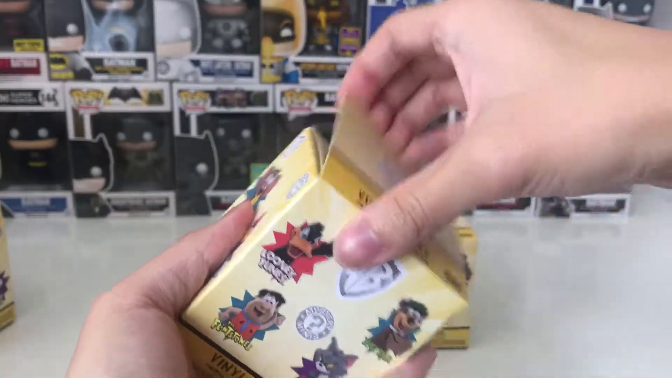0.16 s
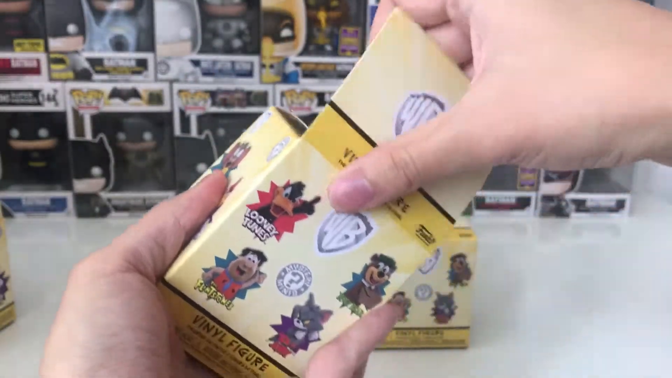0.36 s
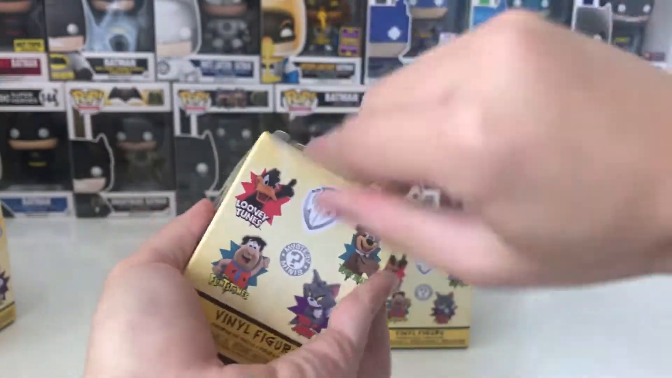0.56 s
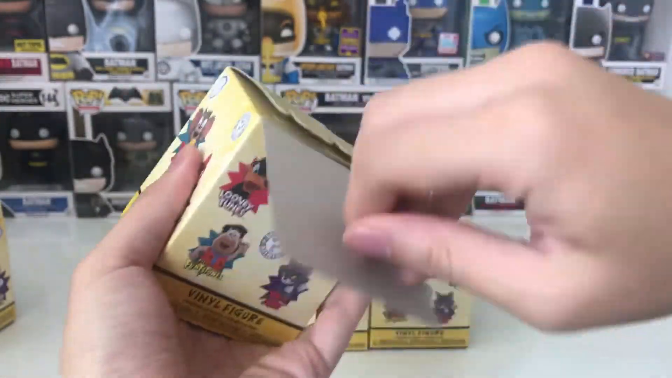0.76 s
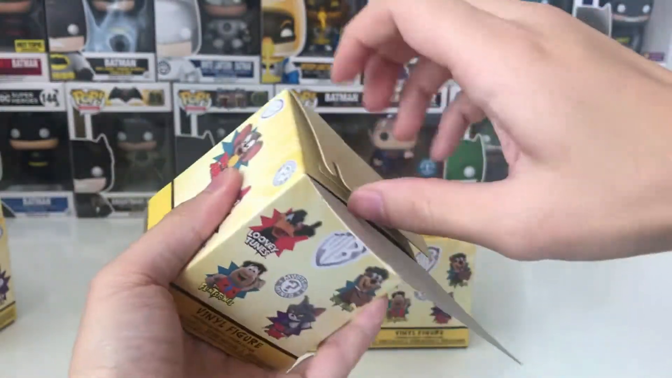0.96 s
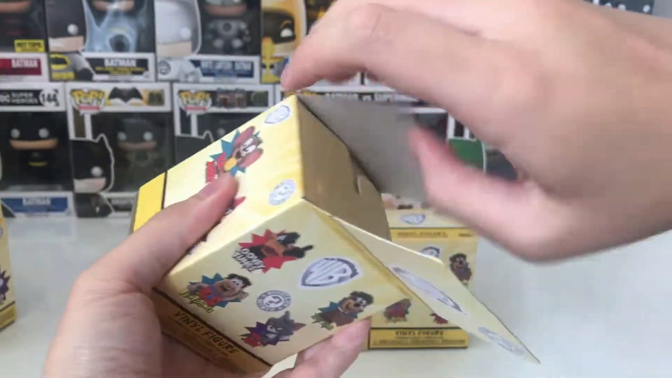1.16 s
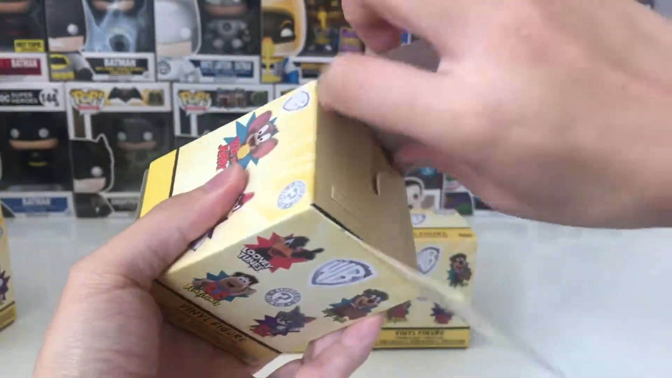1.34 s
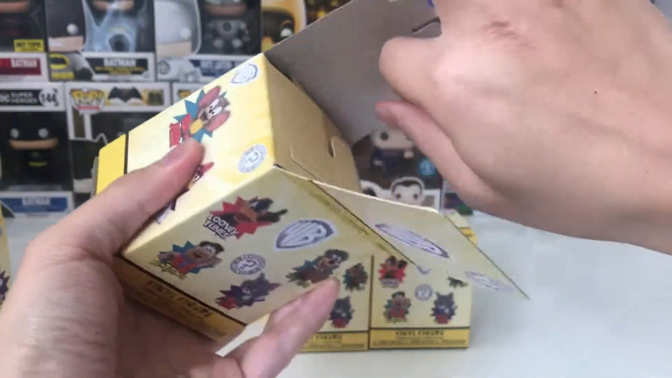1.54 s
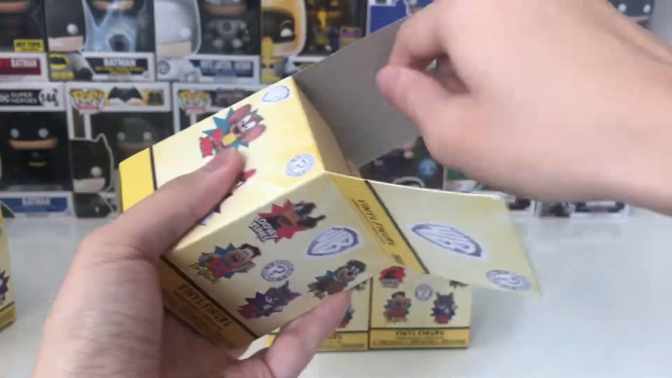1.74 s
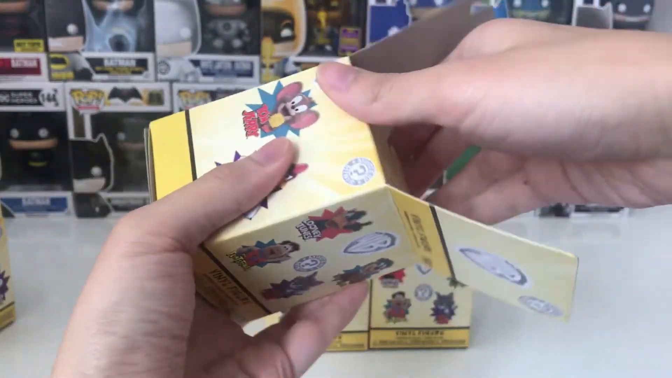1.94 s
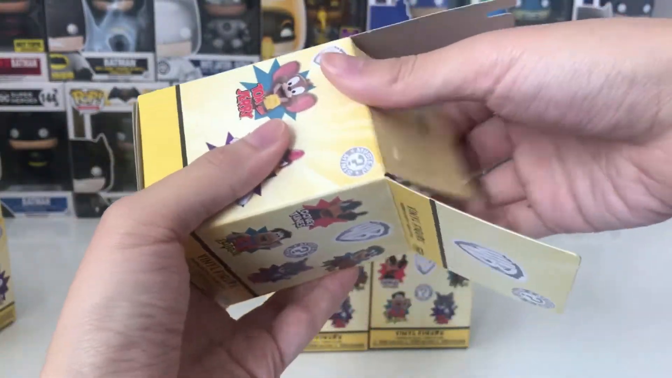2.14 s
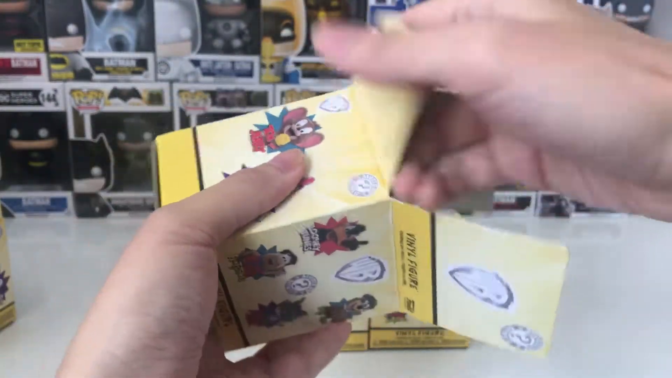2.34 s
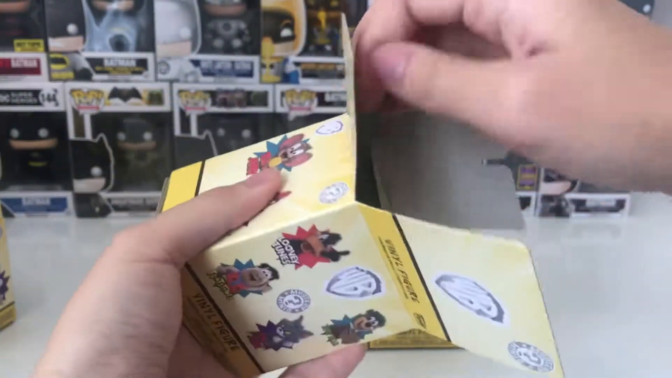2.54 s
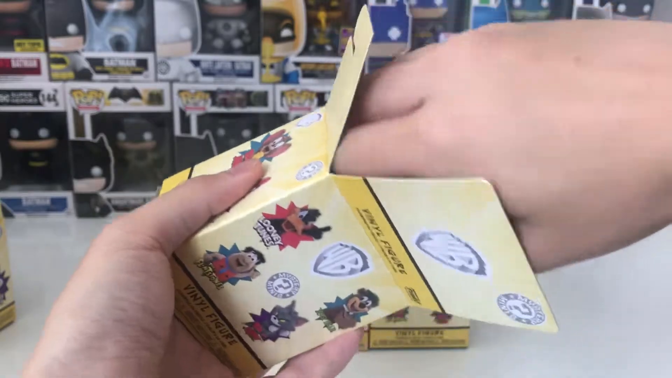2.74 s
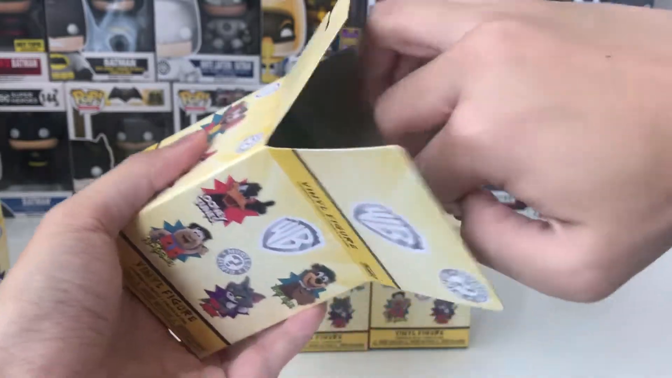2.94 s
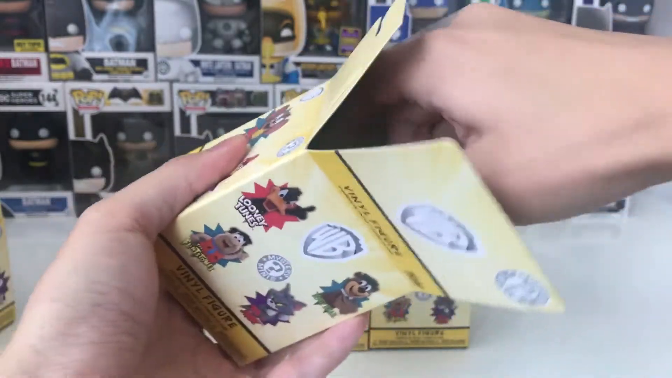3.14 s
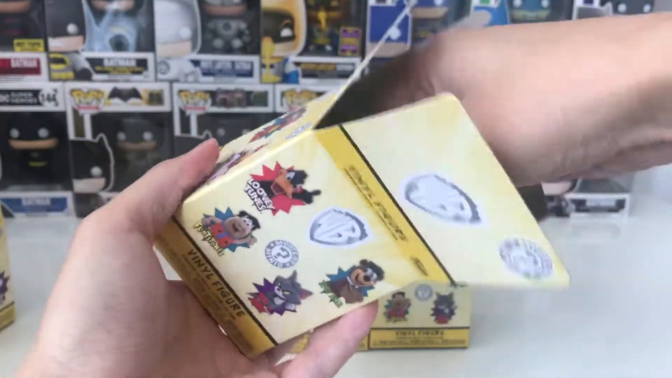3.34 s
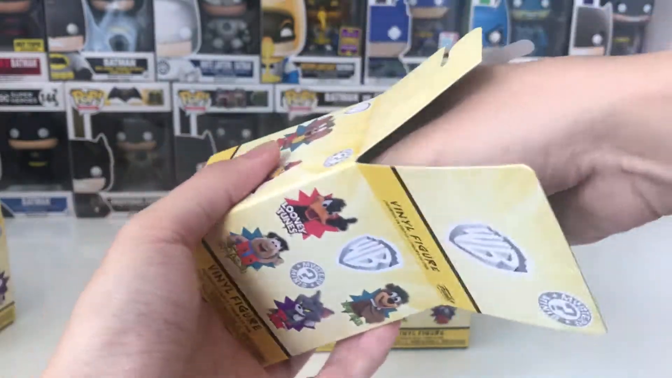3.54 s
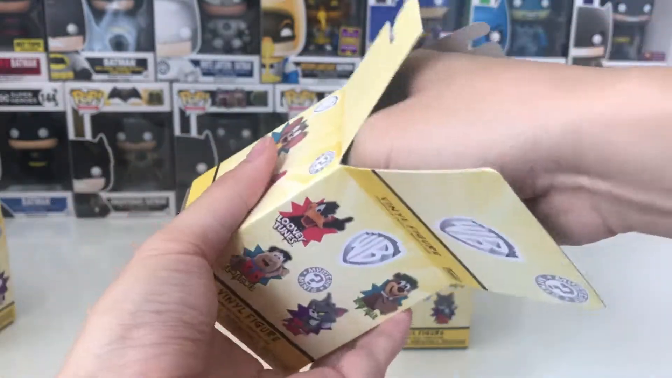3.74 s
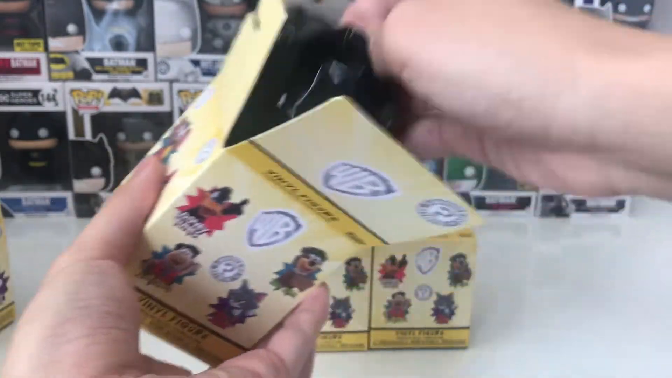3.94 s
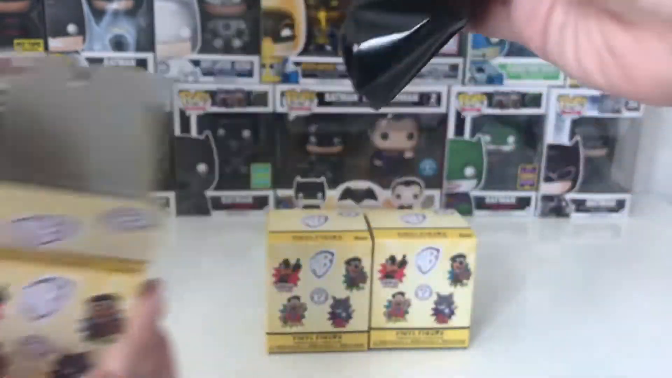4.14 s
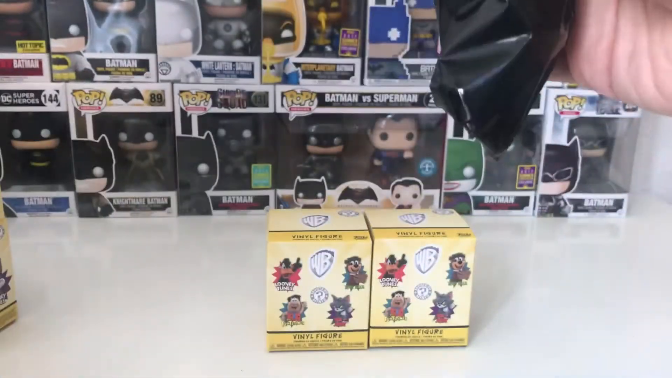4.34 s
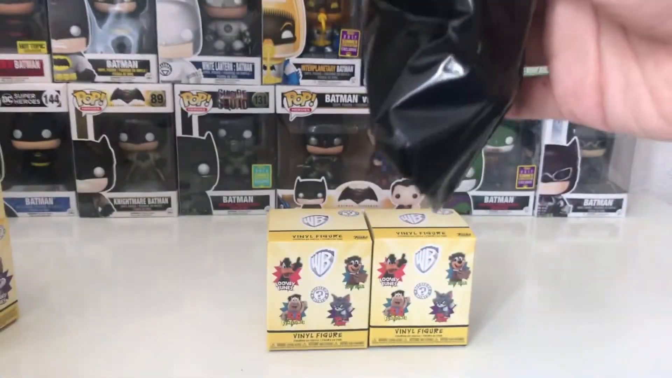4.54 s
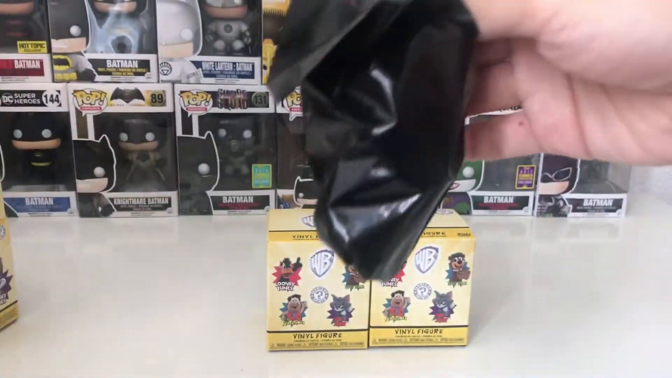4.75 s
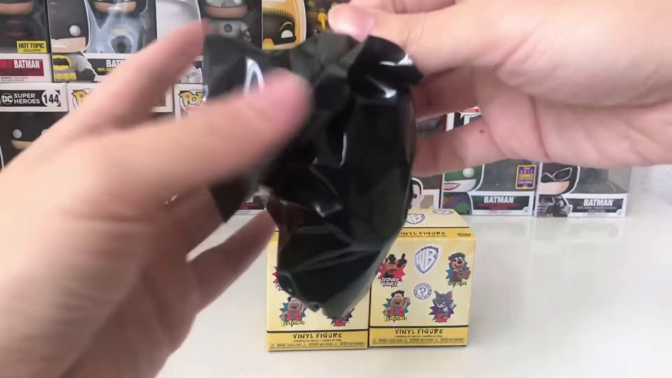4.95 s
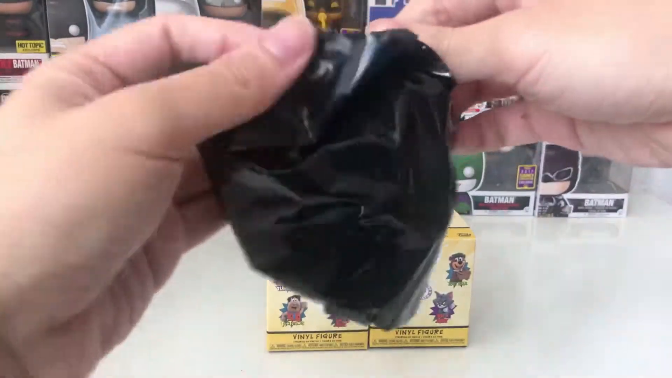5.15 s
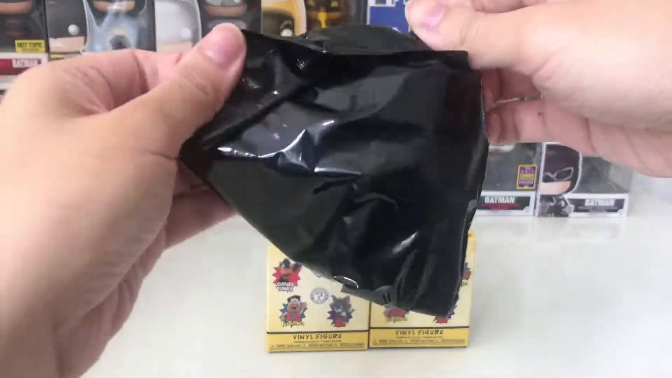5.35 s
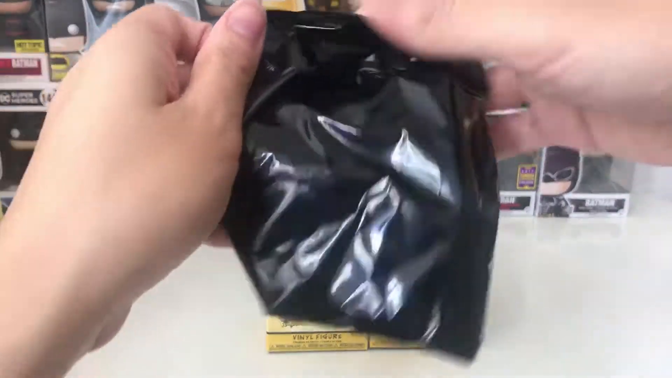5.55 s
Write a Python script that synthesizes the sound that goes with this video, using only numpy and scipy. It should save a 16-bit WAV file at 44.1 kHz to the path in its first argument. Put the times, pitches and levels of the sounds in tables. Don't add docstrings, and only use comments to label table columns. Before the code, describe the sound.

Close microphone, small quiet room with short reverberation and faint hiss. Card tears with a bright crack, flaps scrape and tabs tick with a boxy ring. After a second loud flap snap, a foil bag rustles inside the box, is drawn out with crisp pops, briefly goes nearly quiet with soft desk bumps, then crinkles brightly in the open.

```python
import sys
import numpy as np
from scipy import signal
from scipy.fft import rfft, irfft, next_fast_len
from scipy.io import wavfile
from scipy.ndimage import uniform_filter1d

SR = 44100
rng = np.random.default_rng(int(sys.argv[2]) if len(sys.argv) > 2 else 0)


def wav_out(sig):
    wavfile.write(sys.argv[1], SR, np.round(np.clip(np.atleast_2d(sig).T, -1, 1) * 32767).astype(np.int16))


def rack_gain(trim_db):
    fader = np.asarray(trim_db, float)
    return 10 ** (fader / 20)


N = 251357
LEAD_S = 0.001
FOIL_FROM_S = 3.17
FOIL_T60_S, FOIL_DB = 0.011, 1.5

# centre_hz, width_hz, level_db
BOX_MODES = [(305, 60, -3), (547, 89, 0), (677, 178, 4.5), (968, 300, 6.5), (1210, 255, 4), (1600, 170, 1)]
# centre_hz, width_hz, level_db
FACE_MODES = [(1560, 1260, -1.5), (3150, 90, 4), (3830, 2230, -5.5), (7400, 1100, 0)]


def evened(x):
    return x / np.sqrt(np.mean(x ** 2) + 1e-20)


def peaked(x):
    return x / abs(x).max()


def add(mix, start_s, sound):
    part = mix[round(start_s * SR):][:len(sound)]
    part += sound[:len(part)]


def coloured(x, points):
    point_hz, point_db = np.transpose(points)
    size = next_fast_len(len(x))
    hz = np.fft.rfftfreq(size, 1 / SR)
    level_db = np.interp(np.log(hz + 1), np.log(point_hz + 1), point_db)
    return irfft(rfft(x, size) * rack_gain(level_db), size)[:len(x)]


def resonate(x, hz, width_hz):
    return signal.lfilter(*signal.iirpeak(hz, hz / width_hz, SR), x)


def body(x, modes):
    total = 0
    for k, (hz, width_hz, db) in enumerate(modes):
        total = total + (-1) ** k * rack_gain(db) * resonate(x, hz, width_hz)
    return total


def background():
    # freq_hz, level_db (per Hz)
    air_spectrum = [(41, -59), (70, -2), (129, -8.5), (199, -6), (368, -15.5), (2480, -24.5), (4580, -24),
                    (16000, -36)]
    # time_s, level_db
    drone_swells = [(0.0, -55), (0.8, -58.5), (1.0, -42.5), (1.24, -56), (1.45, -50.5), (1.7, -64),
                    (1.95, -49), (2.25, -66.5), (2.81, -46), (3.16, -55), (3.32, -49.5), (3.52, -61),
                    (3.94, -53), (4.1, -57), (5.7, -57)]
    drone = resonate(resonate(rng.standard_normal(N), 52.3, 2.1), 41.0, 6.7)
    drone = drone / np.sqrt(uniform_filter1d(uniform_filter1d(drone ** 2, 4000), 4000))
    time_s, level_db = np.transpose(drone_swells)
    drone = drone * rack_gain(np.interp(np.arange(N) / SR, time_s, level_db))
    return rack_gain(-61) * evened(coloured(rng.standard_normal(N), air_spectrum)) + drone


def snap(db, ring_hz, box_db, bright_db, t60_s, size=3000):
    t = np.arange(size) / SR - round(LEAD_S * SR) / SR
    splinters = 0.5 * rng.standard_normal(size) * rack_gain(-60 * np.maximum(t / t60_s, -t / 0.0021))
    burst = splinters * rack_gain(3.5 * rng.standard_normal(size)) - 3.2 * (t == 0)
    sheet = resonate(burst, ring_hz, 0.31 * ring_hz)
    sheet = sheet + 0.22 * body(burst, FACE_MODES) + 0.19 * resonate(burst, 3300, 5400)
    tick = signal.lfilter(*signal.butter(1, [6000, 15500], "band", fs=SR), burst)
    hollow = body(burst, BOX_MODES)
    mixed = peaked(sheet) + rack_gain(bright_db - 4.0) * peaked(tick) + rack_gain(box_db - 3.5) * peaked(hollow)
    return rack_gain(db) * mixed


def lid(mix):
    # start_s, peak_db, ring_hz, box_share_db, brightness_db
    tears = [(0.147, -42, 7400, 1, -3), (0.156, -25.5, 4300, -7, 17.5), (0.1721, -5.5, 7400, -39, 2),
             (0.171, -20, 6270, -36, -14.5), (0.1744, -7.5, 6000, -32, -19), (0.177, -10, 10400, -19, -14),
             (0.1841, -4.5, 5900, -5, -15), (0.1874, -11.5, 5800, -4, -19), (0.1904, -14.5, 4410, 0, -32.5),
             (0.2765, -28, 2240, -8, -9.5), (0.284, -27, 4000, -14, -13), (0.754, -22, 1600, -31, -11),
             (0.7727, -16.5, 2900, -9, -15), (0.819, -15, 1650, -9.5, -18), (2.898, -27, 5000, -11.5, 1),
             (2.941, -5.5, 8430, -12.5, -11), (2.9428, -8, 3400, -2, -20)]
    for start_s, *row in tears:
        add(mix, start_s - LEAD_S, snap(*row, t60_s=0.02))


def rasp(length_s, db, hz):
    t = np.arange(9000) / SR
    jerks = rng.standard_normal(len(t)) * rack_gain(2.2 * rng.standard_normal(len(t)))
    sung = evened(resonate(resonate(jerks, hz, 0.14 * hz), hz, 1.0 * hz))
    swell = np.sqrt(np.sin(np.pi * np.clip(t / length_s, 0, 1)).clip(0))
    return rack_gain(db) * sung * swell


def flap_rasps(mix):
    # start_s, length_s, level_db, patch_hz
    drags = [(0.185, 0.088, -42.5, 5960), (1.352, 0.029, -43, 990), (2.095, 0.029, -48.5, 1920),
             (4.565, 0.045, -54, 710), (0.629, 0.071, -37.5, 2900), (0.63, 0.081, -43, 1930),
             (0.657, 0.019, -38, 4400), (0.753, 0.013, -31, 3070), (0.749, 0.014, -38, 1600),
             (0.85, 0.11, -45, 1440), (0.876, 0.042, -41.5, 3150)]
    for start_s, *row in drags:
        add(mix, start_s, rasp(*row))


def slips(grain_db, clump_db):
    clumps = evened(uniform_filter1d(uniform_filter1d(rng.standard_normal(N), 300), 200))
    jerks = rng.standard_normal(N) * (rng.random(N) < 9000 / SR)
    grain = np.minimum(rng.exponential(1, N), 4.2)
    jerks = jerks * rack_gain(grain_db * grain + clump_db * np.clip(clumps, -2, 2))
    return jerks / np.sqrt(uniform_filter1d(jerks ** 2, 4000) + 1e-9)


def mottled(x, patchy_db):
    z = signal.stft(x, nperseg=256)[2]
    patches = uniform_filter1d(uniform_filter1d(rng.standard_normal(z.shape), 3, 0), 14, 1)
    return signal.istft(z * rack_gain(patchy_db * evened(patches)), nperseg=256)[1][:N]


def effort():
    # start_s, length_s, level_db, pressure_db, speed_db
    strokes = [(0.264, 0.39, -54, -10, 3), (0.544, 0.065, -44, -5.5, 2), (0.617, 0.093, -36, -11.5, -2),
               (0.7532, 0.0085, -23, -25, 4), (0.79, 0.16, -36.5, -14.5, -6.5), (0.927, 0.13, -55, 6, -3.5),
               (1.188, 0.03, -52, 9, -3), (1.197, 0.13, -48, -9.5, 5.5), (1.34, 0.094, -42, -1, 2),
               (1.435, 0.12, -53.5, 1.5, 7.5), (1.595, 0.09, -48, -5, -4), (1.712, 0.042, -51, 0, -0.5),
               (1.778, 0.13, -58, -8, 8), (1.935, 0.027, -49.5, 5.5, 3), (2.027, 0.17, -55.5, 1, 3),
               (2.19, 0.047, -53, 8.5, 7.5), (2.224, 0.27, -45.5, 0.5, 1), (2.516, 0.058, -47, 0, -2),
               (2.573, 0.18, -51.5, -3, 2), (2.725, 0.27, -52, 5, 4)]
    # start_s, length_s, level_db, pressure_db, speed_db
    handfuls = [(3.138, 0.11, -45, 3, 0.5), (3.265, 0.065, -48, -10.5, -1.5), (3.338, 0.25, -44.5, -5.5, 0),
                (3.52, 0.24, -42, -14, -4.5), (3.77, 0.1, -38.5, -7.5, -3.5),
                (3.857, 0.079, -32, -13, -1.5), (3.934, 0.11, -33.5, -6.5, 2.5),
                (4.028, 0.19, -53.5, -3.5, -24), (4.16, 0.34, -58.5, -10.5, -2),
                (4.486, 0.089, -43, -8.5, -2.5), (4.556, 0.091, -51.5, 6, -5),
                (4.693, 0.07, -55.5, 2.5, -3.5), (4.819, 0.098, -54, -23, 2.5), (4.991, 0.2, -49, -4.5, 4),
                (5.108, 0.28, -39, -2, -5.5), (5.355, 0.5, -44, -2.5, -2)]
    # start_s, t60_s, level_db, pressure_db, speed_db
    shudders = [
        (0.176, 0.69, -36.5, 2, 2),
        (0.761, 0.18, -35.5, -2.5, -8),
        (1.606, 0.22, -60.5, 26.5, 2),
        (2.941, 0.43, -29, 0, -3),
    ]
    t = np.arange(N) / SR
    power = np.full((4, N), 1e-10)

    def touch(shape_db, start_s, db, pressure_db, speed_db):
        grip_db = -8.5 + db + pressure_db + 0.35 * speed_db
        grip_db += 8 * (start_s > FOIL_FROM_S)
        parts_db = np.array([grip_db, db + pressure_db, db, db + speed_db])
        power[:] += rack_gain(2 * parts_db)[:, None] * rack_gain(2 * shape_db)

    for start_s, length_s, *row in [*strokes, *handfuls]:
        touch(-9 * abs(2 * (t - start_s) / length_s - 1) ** 2.9, start_s, *row)
    for start_s, t60_s, *row in shudders:
        since_s = t - start_s
        touch(-60 * np.where(since_s > 0, since_s / t60_s, -since_s / 0.0018), start_s, *row)
    return 10 * np.log10(power)


def rubbing():
    # freq_hz, level_db
    hiss_spectrum = [(1500, -62), (4000, -5), (6000, 8), (9000, 6.5), (11500, 4.5), (15000, -0.5)]
    grip_db, box_db, face_db, hiss_db = effort()
    foil = (np.arange(N) / SR > FOIL_FROM_S) & (face_db > -51)
    fine = slips(2.5, 2.2)
    coarse = slips(3.2, 2.5)
    shared = np.where(foil, coarse, fine)
    creaks = slips(2.5, 3.5)
    low = 0.41 * shared + 1.18 * creaks
    grip = resonate(resonate(low, 136, 290), 274, 288)
    box = mottled(resonate(body(low, BOX_MODES), 730, 3200), 4.0)
    face = mottled(resonate(body(shared, FACE_MODES[:-1]), 2800, 5000), 3.5)
    hiss = mottled(coloured(shared, hiss_spectrum), 2.4)
    parts = [(grip_db, grip), (box_db, box), (face_db, face), (hiss_db, hiss)]
    return sum(rack_gain(db - 4.5) * evened(x) for db, x in parts)


def knock(db, hz, t60_s):
    t = np.arange(5000) / SR
    blow = t * hz / 0.085
    scuff = rng.standard_normal(len(t)) * np.exp(-t / 0.0078) * np.minimum(t / 0.0054, 1)
    push = 3.55 * blow * np.exp(-blow) + scuff
    thud = resonate(resonate(push, hz, 4.8 * hz), hz, 5.5 * hz)
    cycles = resonate(thud, hz, 3.25 / max(t60_s, 0.005))
    hollow = body(push, BOX_MODES)
    return rack_gain(db) * peaked(peaked(cycles) + 0.39 * peaked(thud) + 0.34 * peaked(hollow))


def held_box_thumps(mix):
    # start_s, peak_db, pitch_hz, t60_s
    thumps = [
        (0.277, -34.5, 159, 0.016),
        (2.311, -39, 176, 0.18),
        (2.941, -24, 148, 0.11),
        (3.057, -37, 110, 0.056),
        (3.907, -28, 119, 0.0085),
        (3.99, -33, 117, 0.11),
    ]
    for start_s, *row in thumps:
        add(mix, start_s, knock(*row))


def tabs(mix):
    # start_s, peak_db, ring_hz, brightness_db
    clicks = [(0.306, -46, 2890, -13), (0.3794, -36, 1890, -15), (1.177, -37, 1630, -4),
              (1.297, -30.5, 3750, -17.5), (1.3492, -32.5, 5660, -16), (1.4582, -40, 5610, 8),
              (1.6018, -32.5, 1950, -23), (1.6105, -47, 2500, -15), (1.6247, -36, 1590, -20),
              (1.8873, -30.5, 3830, -6), (1.897, -28.5, 3800, 1), (1.938, -33, 5100, -14),
              (2.041, -35, 1600, -27), (2.054, -33, 2070, -11), (2.064, -34, 2000, -17),
              (2.205, -28.5, 1900, -15), (2.2905, -32, 1540, -15), (2.303, -34.5, 3120, -15),
              (2.367, -31, 6000, -27), (2.378, -31, 4570, -18), (2.398, -33.5, 4100, 1),
              (2.797, -28, 1640, -20)]
    for start_s, db, ring_hz, bright_db in clicks:
        add(mix, start_s - LEAD_S, snap(db, ring_hz, -1, bright_db, t60_s=0.029))


def wall_knocks(mix):
    # start_s, peak_db, pitch_hz, t60_s
    knocks = [(0.817, -37.5, 575, 0.096), (1.286, -32.5, 188, 0.019), (1.458, -37.5, 585, 0.06),
              (1.479, -40, 384, 0.015), (1.603, -30.5, 540, 0.018), (1.669, -40, 125, 0.048),
              (1.884, -37.5, 810, 0.045), (2.055, -35.5, 910, 0.025), (2.148, -37.5, 795, 0.0088),
              (2.160, -31.5, 524, 0.038), (2.208, -37, 168, 0.029), (2.378, -33, 1090, 0.035),
              (2.400, -42, 1060, 0.041), (2.478, -35.5, 616, 0.037), (2.797, -33, 305, 0.022),
              (2.9422, -20.5, 1570, 0.016), (2.944, -22.5, 550, 0.058), (2.966, -27, 1020, 0.034),
              (3.003, -31, 141, 0.067), (3.089, -39, 800, 0.02), (3.371, -34.5, 606, 0.012),
              (3.3833, -15, 254, 0.024), (3.81, -41, 125, 0.046), (3.901, -19.5, 940, 0.022),
              (3.9124, -16, 936, 0.042), (3.9855, -21, 1010, 0.026), (4.0291, -22, 807, 0.036),
              (4.538, -30.5, 907, 0.06), (4.583, -35, 107, 0.05)]
    for start_s, *row in knocks:
        add(mix, start_s, knock(*row))


def foil_in_box(mix):
    # start_s, peak_db,
    # ring_hz, box_share_db
    box_creases = [(3.1793, -31.5, 3320, -6), (3.1834, -30, 3470, -4), (3.1965, -24, 3250, -12),
                   (3.2057, -22, 4230, -23), (3.214, -18.5, 7100, -29), (3.2218, -37, 6030, -20),
                   (3.2797, -30, 1490, -3), (3.2857, -18, 4260, -14), (3.318, -30, 1210, -8),
                   (3.36, -24.5, 4400, -29), (3.3724, -33, 3450, -1), (3.385, -25.5, 3720, -3),
                   (3.39, -28, 3920, -4), (3.397, -27, 2370, -6), (3.4047, -20, 6600, -10),
                   (3.41, -23, 9450, -29), (3.4319, -27, 3200, -4), (3.462, -28, 1270, -4),
                   (3.4784, -31, 2970, -15), (3.4849, -19, 7250, -11.5), (3.4928, -28, 7280, -5),
                   (3.5066, -33, 7240, -3), (3.5119, -22.5, 6500, -5), (3.5145, -21, 1780, -13),
                   (3.5333, -22.5, 5470, -15), (3.559, -33, 4750, -2), (3.5694, -14, 1560, -25),
                   (3.5836, -28, 9780, -7), (3.5873, -32, 3660, 0), (3.5914, -23, 1290, -6),
                   (3.604, -20.5, 9090, -36), (3.6095, -23.5, 3520, -33), (3.6158, -33, 9600, -24),
                   (3.627, -32, 3750, -21), (3.639, -19, 6000, -14.5), (3.647, -26, 5680, -6),
                   (3.654, -32, 6980, -6), (3.6598, -20.5, 8360, -15), (3.6676, -24, 3750, -16),
                   (3.6703, -23.5, 6420, -22), (3.678, -24.5, 1500, -17), (3.686, -27, 4610, -16),
                   (3.6894, -35, 5810, -8), (3.6968, -34, 3830, -10), (3.7066, -26.5, 7000, -12),
                   (3.709, -19, 3770, -40), (3.7203, -33, 5430, -3), (3.7324, -25.5, 3900, -23),
                   (3.798, -26, 6100, -18), (3.8025, -18.5, 6600, -14), (3.8317, -25, 11200, -5),
            (3.8384, -23, 4340, -5), (3.8516, -40, 2070, -14), (3.8667, -28, 1980, -3),
            (3.8703, -24, 6300, -18), (3.879, -31, 4180, -17), (3.8873, -31, 4130, -15),
            (3.8946, -31, 5300, -24), (3.9013, -14, 3300, -3), (3.912, -15.5, 6600, -6),
            (3.922, -21, 7300, -8), (3.9312, -26, 6420, -4), (3.9427, -35, 4010, -7),
            (3.9527, -24, 8700, -16), (3.9625, -24, 1210, -5), (3.9698, -16.5, 5560, -5),
            (3.9722, -22, 4300, -6), (3.977, -28, 1850, -5), (3.9812, -21, 3790, -16),
            (3.986, -14.5, 4050, -16), (3.9893, -24, 6330, -19), (3.991, -22, 3680, -21),
            (4.0015, -13.5, 5160, -31), (4.006, -34, 6550, -12), (4.0099, -21, 5170, -19),
            (4.017, -17, 6850, -22), (4.021, -13, 5670, -29), (4.0267, -22, 5600, -16),
            (4.044, -25, 7110, -6), (4.056, -24, 2540, -16), (4.0806, -26.5, 7200, -13),
            (4.098, -31, 5300, -3), (4.1193, -21.5, 4050, -32), (4.148, -19.5, 2500, -19),
            (4.1515, -14, 5900, -27), (4.1571, -27.5, 5570, -7),
                   (4.2814, -22, 9360, -22), (4.2853, -37, 12270, -30), (4.3471, -41.5, 4050, -22),
             (4.4877, -39, 4260, -23), (4.5128, -39, 2500, -13), (4.5335, -24.5, 7900, -11),
             (4.5438, -25, 3980, -1), (4.5528, -29, 1970, -21), (4.572, -31, 2130, 7),
             (4.5794, -29, 1580, -6), (4.6477, -24.5, 2330, -4), (4.6768, -29, 4100, -11.5),
             (4.8268, -29.5, 1950, -19), (4.8423, -30, 3500, -12), (4.883, -37.5, 6000, -11)]
    for start_s, db, ring_hz, box_db in box_creases:
        crease = snap(db + FOIL_DB, ring_hz, min(box_db, -6), -31, FOIL_T60_S, size=1200)
        add(mix, start_s - LEAD_S, crease)


def foil_in_free_air(mix):
    # start_s, peak_db, ring_hz, brightness_db
    air_creases = [(4.9612, -34, 11900, -8), (4.9905, -22, 3320, 12), (4.993, -35, 2370, -15),
                   (5.0017, -30, 4180, -13), (5.0104, -31, 3360, -22), (5.0233, -21, 4470, -15),
                   (5.0365, -37, 3700, -17), (5.041, -30, 4090, -22), (5.0467, -13.5, 11700, 5),
                   (5.0509, -17.5, 2940, -20), (5.082, -23.5, 3570, -23), (5.0866, -32, 3620, -25),
                   (5.0955, -30, 2760, -28), (5.1094, -16.5, 6300, -23), (5.1109, -20.5, 3500, -28),
                   (5.1184, -27, 1290, -26), (5.1298, -29, 7320, -13), (5.1437, -17.5, 3700, -5),
                   (5.1467, -24, 6200, -22), (5.158, -24, 5400, -31), (5.1617, -29, 3790, -15),
                   (5.1666, -19, 11200, -15), (5.1706, -25, 3830, -19), (5.1781, -14, 4340, -15),
                   (5.1808, -16, 2960, -4), (5.1837, -20, 5500, -8), (5.191, -32, 1590, -20),
                   (5.202, -26, 9130, -10), (5.2156, -44, 4690, -18), (5.22, -16.5, 8700, -11),
                   (5.2245, -28, 8830, -14), (5.235, -27, 5770, -2), (5.25, -18.5, 3600, -15),
                   (5.2487, -19, 5990, -12), (5.2529, -19.5, 3900, -8), (5.261, -18, 3820, -12),
                   (5.2689, -20, 6400, -8), (5.2748, -18.5, 3300, -20), (5.2777, -18, 6000, -10),
                   (5.283, -21, 3900, -19), (5.292, -19, 4360, -6), (5.295, -23, 2500, -18),
                   (5.3004, -28, 4520, -13), (5.303, -21, 3750, -21), (5.3123, -28, 2760, -21),
                   (5.3154, -21, 11670, -9), (5.3208, -19, 3450, -24), (5.325, -21, 3660, -28),
                   (5.3411, -19.5, 3520, -20), (5.3441, -38, 3660, -27), (5.349, -20, 8300, -13),
               (5.352, -27, 3920, -25), (5.3587, -17, 1530, -24), (5.3625, -29, 9430, -15),
               (5.375, -26, 1590, -25), (5.3818, -36, 7060, -25), (5.389, -26, 7000, -23),
               (5.391, -35, 5430, -15), (5.398, -22, 2950, -19), (5.412, -28, 1380, -27),
               (5.4209, -13, 3200, -10), (5.4221, -22, 3560, -25), (5.4295, -28, 3270, -22),
               (5.4341, -20, 3540, -24), (5.4483, -19.5, 9090, -12), (5.4566, -14, 7900, -21),
               (5.4717, -29, 3660, -17), (5.478, -22.5, 9200, -14), (5.4925, -10, 3400, -3),
               (5.501, -27, 3750, -20), (5.5162, -21, 3080, -20), (5.5213, -34, 5100, -23),
               (5.5385, -31, 3250, -22), (5.5473, -23, 3830, -9), (5.5542, -40, 3620, -24),
               (5.5633, -30, 4440, -14.5), (5.57, -25, 7500, -15), (5.5815, -21, 11700, -12),
               (5.5908, -23, 1390, -32), (5.6024, -21.5, 3830, -18), (5.614, -38, 1940, -25),
               (5.6322, -25, 3640, -21), (5.638, -33, 4220, -16), (5.6456, -24, 3700, -21),
               (5.6553, -23.5, 4100, -9), (5.657, -19, 8900, -16), (5.66, -26, 5250, -16),
               (5.67, -17, 7140, -12), (5.6767, -32, 1420, -16), (5.6846, -23, 5470, 2)]
    for start_s, db, ring_hz, bright_db in air_creases:
        crease = snap(db + FOIL_DB, ring_hz, -19.5, bright_db - 5.5, FOIL_T60_S, size=1200)
        add(mix, start_s - LEAD_S, crease)


def desk_landing(mix):
    # start_s, peak_db, pitch_hz, t60_s
    jolts = [
        (4.538, -33, 300, 0.039),
        (4.549, -34, 145, 0.054),
        (4.569, -32.5, 175, 0.034),
    ]
    for start_s, *row in jolts:
        add(mix, start_s, knock(*row))


def room(x):
    # freq_hz, t60_s
    decay = [(300, 0.3), (2000, 0.26), (12000, 0.31)]
    hz, t, z = signal.stft(rng.standard_normal(SR // 2), SR, nperseg=256)
    decay_hz, decay_t60_s = np.transpose(decay)
    fade = rack_gain(-60 * t / np.interp(hz, decay_hz, decay_t60_s)[:, None])
    tail = signal.istft(z * fade, SR, nperseg=256)[1]
    tail = np.r_[np.zeros(150), tail / np.linalg.norm(tail)]
    return signal.fftconvolve(x, tail)[:N]


def scene():
    hits = np.zeros(N)
    for source in (lid, flap_rasps, held_box_thumps, tabs, wall_knocks, foil_in_box, foil_in_free_air):
        source(hits)
    steady = background() + rubbing() + rack_gain(-16.5) * room(hits)
    desk_landing(steady)
    steady = signal.oaconvolve(steady, signal.firwin(301, 15900, fs=SR), "same")
    hits = signal.oaconvolve(hits, signal.firwin(201, 16300, fs=SR), "same")
    return (hits + steady)[None]


def low_pass(x):
    return signal.sosfilt(signal.butter(12, 16850, fs=SR, output="sos"), x)


def record(dry):
    # centre_hz, width_hz, depth (0-1)
    desk_dips = [(4810, 233, 0.68), (10330, 450, 0.5)]
    for hz, width_hz, depth in desk_dips:
        dry = dry - depth * resonate(dry, hz, width_hz)
    return low_pass(np.clip(dry, -1, 1))


dry = scene()
out = record(dry)
wav_out(out)
```